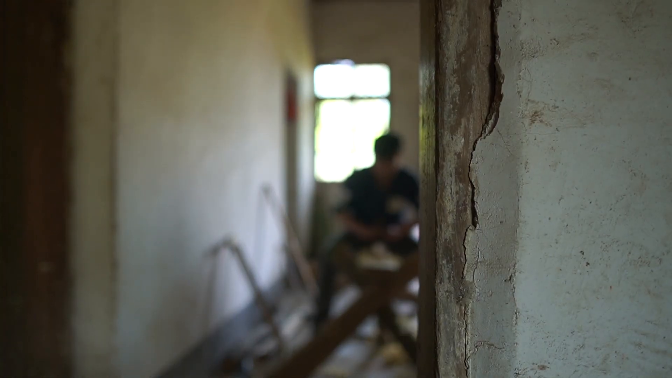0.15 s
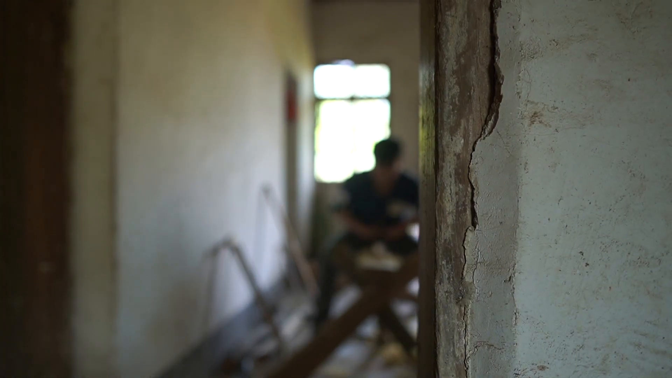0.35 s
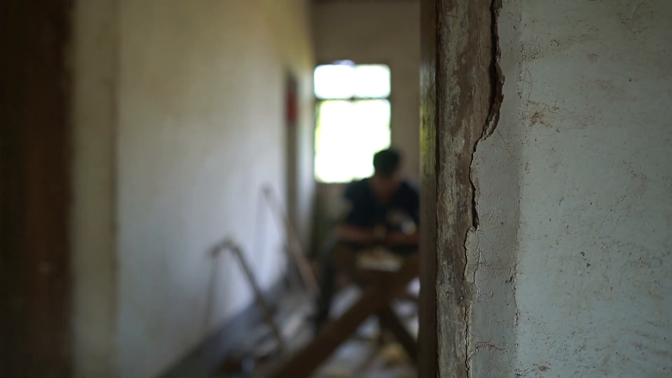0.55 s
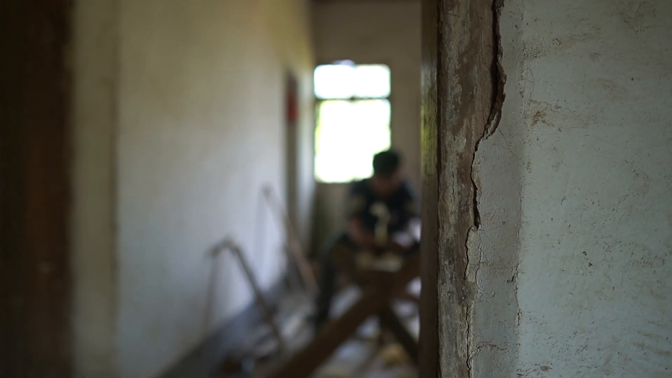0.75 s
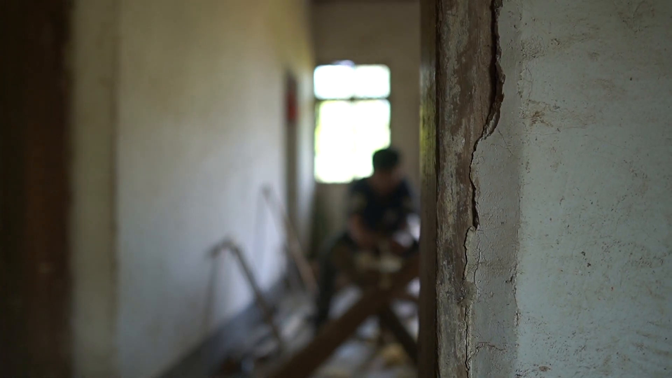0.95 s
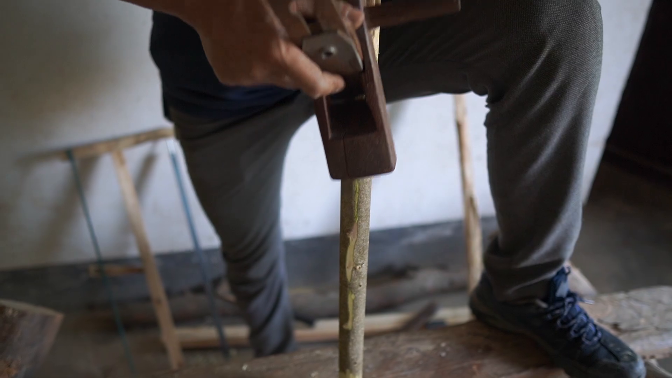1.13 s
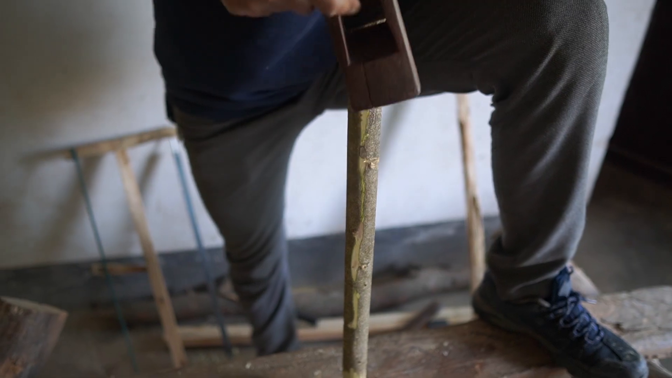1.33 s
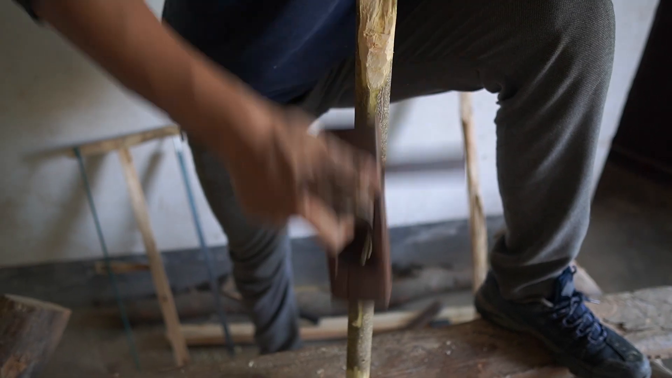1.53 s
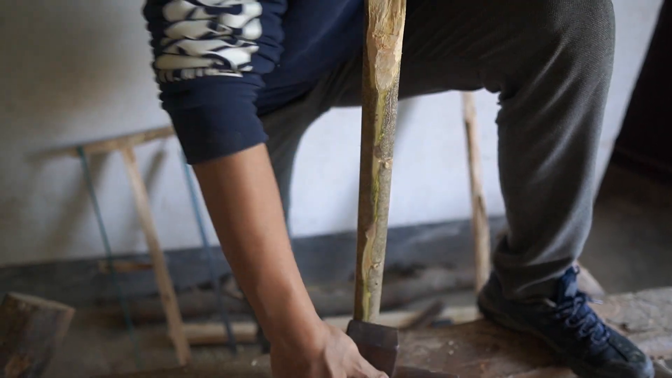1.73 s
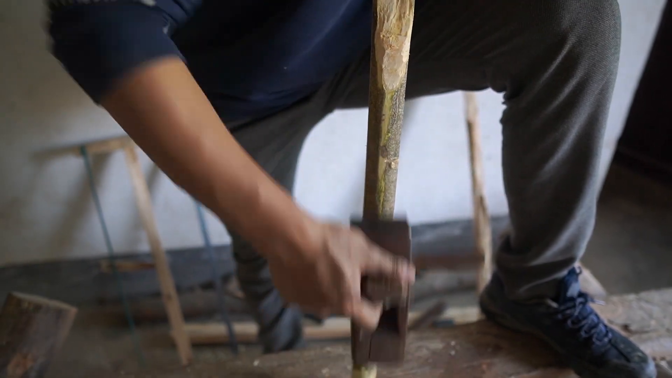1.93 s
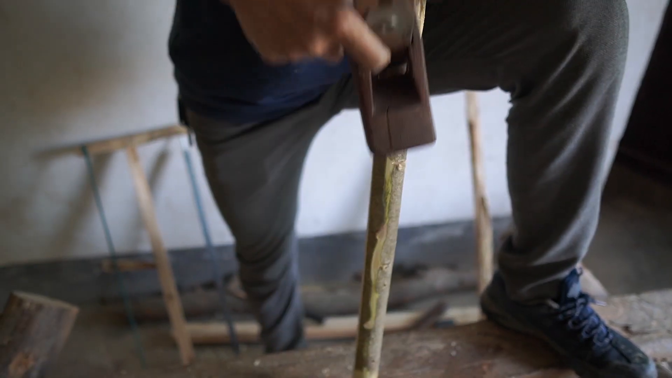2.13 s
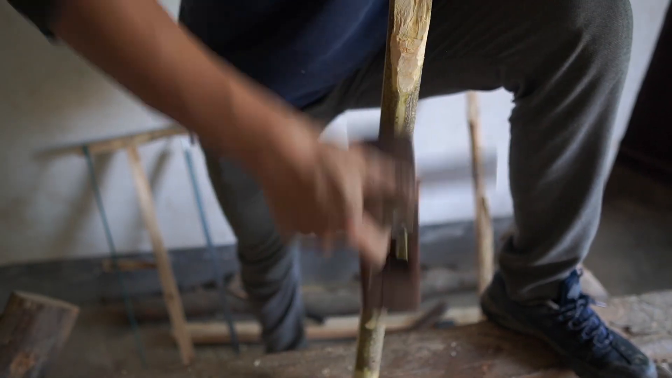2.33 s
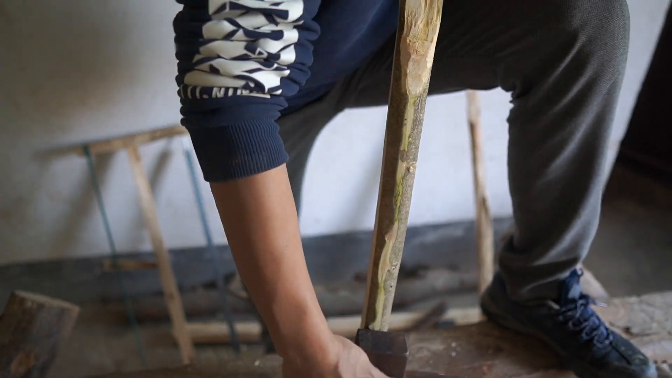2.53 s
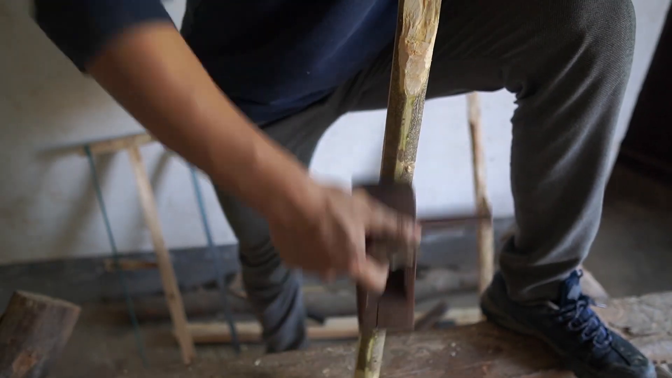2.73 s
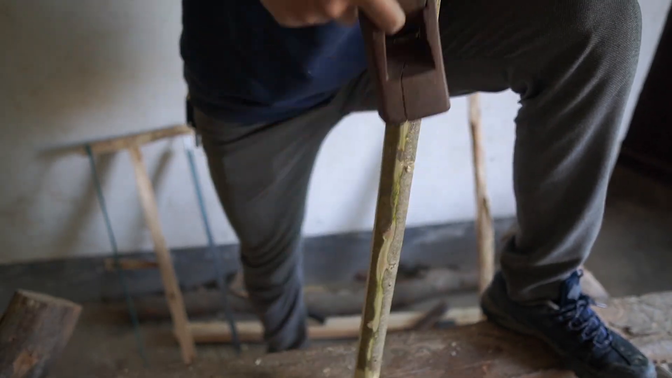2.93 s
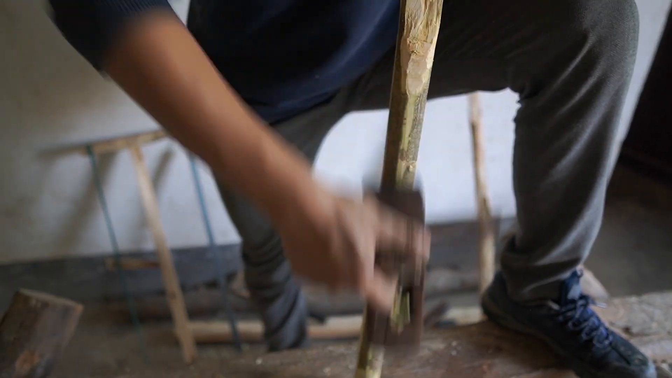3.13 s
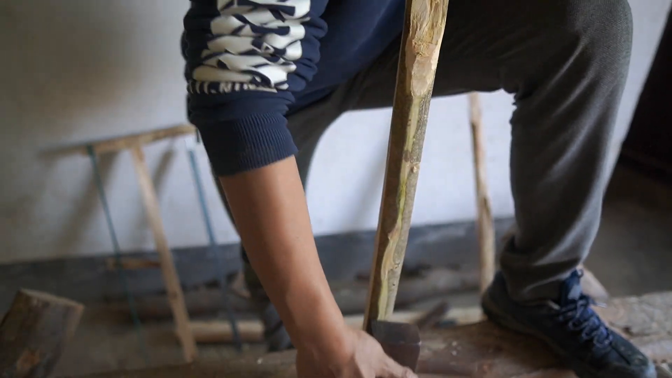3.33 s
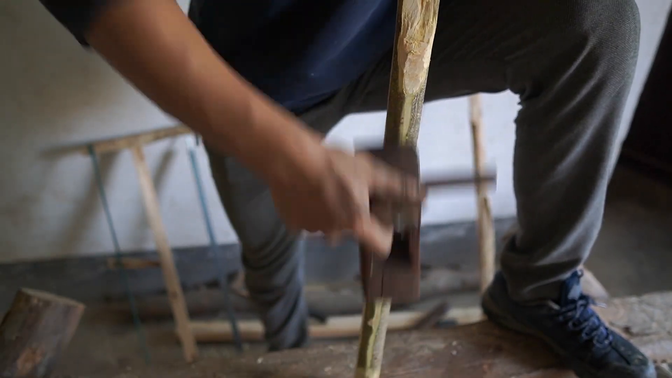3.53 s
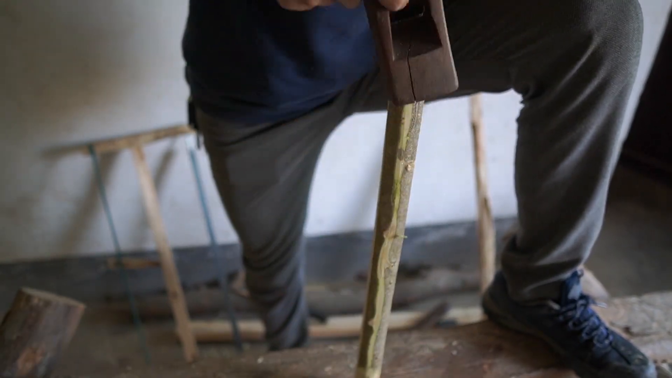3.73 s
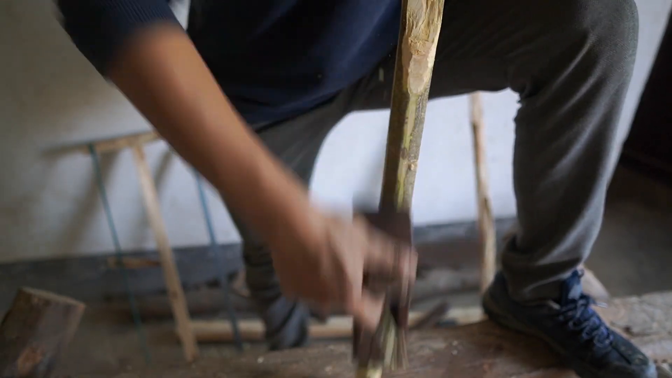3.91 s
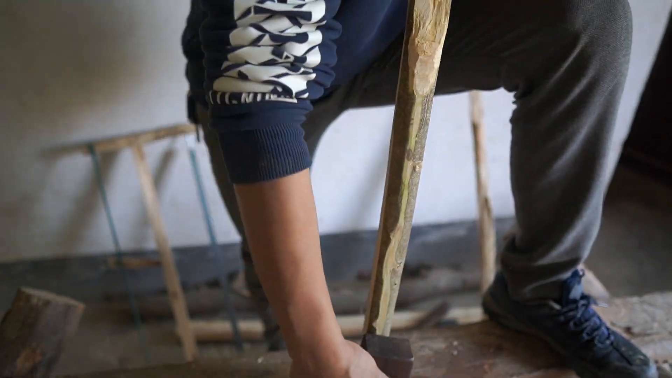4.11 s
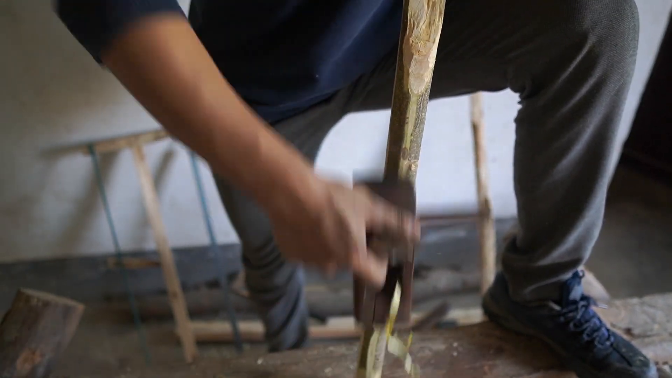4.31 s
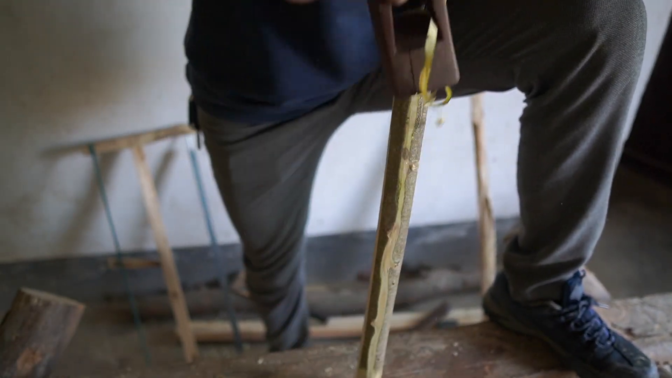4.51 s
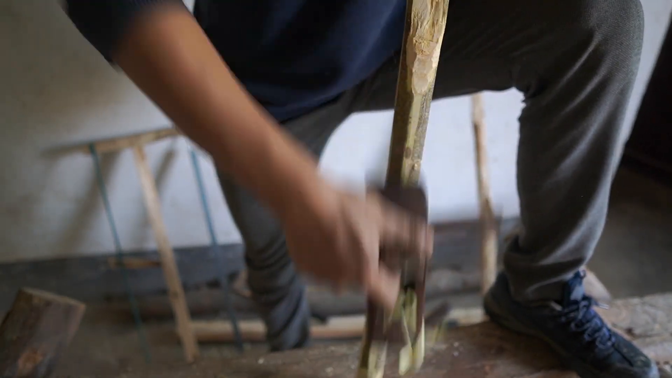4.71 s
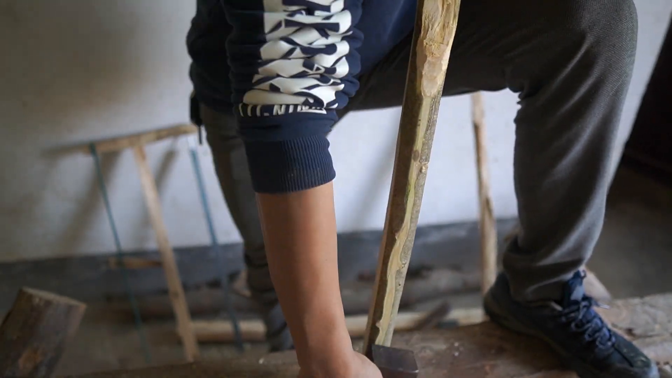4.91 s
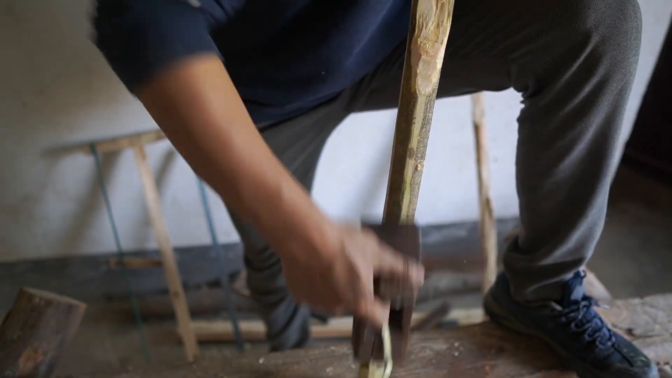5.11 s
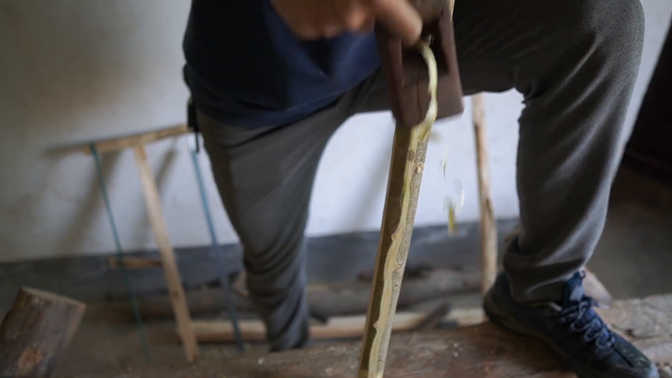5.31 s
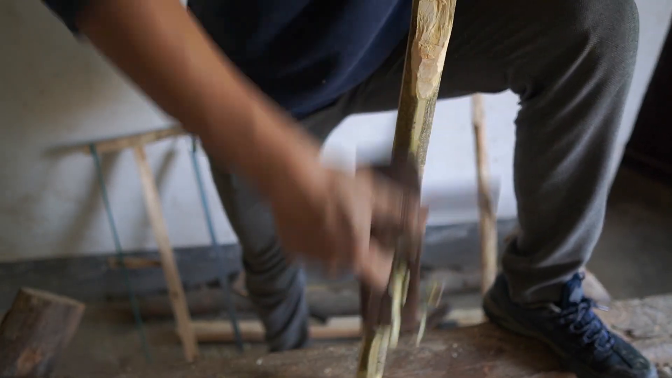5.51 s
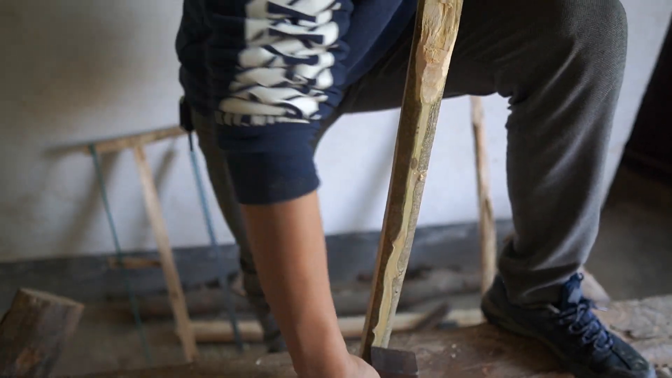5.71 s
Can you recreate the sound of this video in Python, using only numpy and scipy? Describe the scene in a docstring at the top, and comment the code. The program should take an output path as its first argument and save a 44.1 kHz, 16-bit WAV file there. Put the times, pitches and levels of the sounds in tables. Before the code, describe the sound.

A hand plane scrapes a green wooden stick, one echoing stroke from a doorway, then six crisp close strokes with knocks and rattles between.

```python
"""A bare plastered room: a wooden hand plane shaves a green stick into a handle on a workbench.
One stroke is heard from the doorway, then, after a cut, six from close by. Random fibre snaps, gated by
each stroke, ring the wooden stock, the shaving and the iron. Between strokes the sole is dragged back and the
plane is set down with knocks that ring the bench; the stick shudders, rattles and bumps, and sleeves rustle.
Table levels are relative, before the mix gains in each function."""
import sys
import numpy as np
from scipy import signal
from scipy.fft import rfft, irfft
from scipy.io import wavfile
from scipy.ndimage import map_coordinates

SR = 44100
rng = np.random.default_rng(int(sys.argv[2]) if len(sys.argv) > 2 else 0)


def wrap_up_sound(samples):
    """Save the sound to the file named by the first command line argument, as 16-bit audio."""
    columns = np.atleast_2d(samples).T
    # keep every value between -1 and 1, then stretch to whole-number steps
    tamed = np.clip(columns, -1, 1)
    steps = np.round(tamed * 32767).astype(np.int16)
    wavfile.write(sys.argv[1], SR, steps)


N = 254016
TIME = np.arange(N) / SR

# close strokes: start [t/s], length [t/s], deepening [1 = usual], stock, tearing, iron, bench [level/dB],
# run-up [t/s], run-up [level/dB], sleeve rustle on the way back [level/dB]
STROKES = [(1.55, 0.18, 1, -21.5, -22.5, -24, -41, 0.023, -29, -48),
           (2.351, 0.17, 0.42, -21, -21.5, -21.5, -41, 0.07, -39, -53),
           (3.129, 0.2, 0.71, -22, -21, -21, -42.5, 0.064, -31.5, -47),
           (3.932, 0.16, 1.62, -20.5, -23, -24, -38, 0.083, -27, -44.5),
           (4.711, 0.19, 0.92, -19.5, -23, -22.5, -38, 0.075, -33.5, -45),
           (5.554, 0.17, 1.22, -21, -23, -24, -36.5, 0.043, -27, -48)]
# iron jumps out of the cut and bites again: start, end [t/s], loss (negative = gain), new-bite jolt [level/dB]
SKIPS = [(1.604, 1.627, 30, 8), (2.389, 2.421, 33, 6.5), (3.171, 3.184, 14, 2), (3.98, 4.03, -1, 9.5),
         (4.787, 4.804, 9, 2.5)]
# change over a full stroke of usual deepening
STOCK_RISE_DB, TEAR_RISE_DB, IRON_FALL_DB = 9.5, 2, 12
ENTRY_DB, ENTRY_S = 7.5, 0.013   # extra jolt as the edge enters the wood
DEEPEST_SHARE, EASE_DB = 0.94, 5   # share of stroke at deepest cut; loss as the push eases after it
GRAIN_HZ, GRAIN_DB = 22.7, 1.8   # uneven grain makes each part waver


def bite():
    """Gains of stock, tearing and iron: each stroke starts bright, grows woodier as it deepens, then eases."""
    total = 0
    for start, length, deepening, stock_db, tear_db, iron_db, *_ in STROKES:
        travel = np.clip((TIME - start) / length, 0, 1)
        depth = deepening * (np.minimum(travel / DEEPEST_SHARE, 1) - .5)
        ease_db = EASE_DB * np.maximum(travel - DEEPEST_SHARE, 0) / (1 - DEEPEST_SHARE)
        entry_db = ENTRY_DB * np.exp(-np.maximum(TIME - start, 0) / ENTRY_S)
        parts_db = [stock_db + STOCK_RISE_DB * depth + entry_db,
                    tear_db + TEAR_RISE_DB * depth + entry_db,
                    iron_db - IRON_FALL_DB * depth]
        total = total + contact(start, start + length, release_s=0.017) * from_db(parts_db - ease_db)
    skips_db = 0
    for start, end, loss_db, jolt_db in SKIPS:
        lift = np.clip((TIME - start) / 0.011, 0, 1) * (TIME < end)
        skips_db = skips_db + jolt_db * contact(end, end, ENTRY_S) - loss_db * lift
    return [part * from_db(skips_db) * flutter(GRAIN_HZ, GRAIN_DB) for part in total]


# resonances of the stock: centre [f/Hz], width [f/Hz], [level/dB]
STOCK_MODES = [(1706, 160, 1.5), (1781, 202, 2), (1918, 181, -0.5), (2340, 164, -1.5), (2405, 237, -4),
               (2751, 73, 0), (3113, 270, -8), (3340, 210, -11.5), (3804, 98, -6.5)]
# resonances of the shaving: centre [f/Hz], width [f/Hz], [level/dB]
SHAVING_MODES = [(4384, 31, 1.5), (5140, 108, 0.5), (5560, 91, -3.5), (6058, 180, 0), (6720, 194, 0),
                 (7097, 124, 2), (7204, 115, 0), (7830, 390, -12.5)]
# resonances of the iron: centre [f/Hz], width [f/Hz], [level/dB]
IRON_MODES = [(9024, 74, 2.5), (8500, 130, -8.5), (9534, 200, -9.5), (10270, 730, -15), (12070, 230, -6.5),
              (12470, 81, -7.5), (14400, 1700, -21), (14800, 400, -10.5)]
# stick-slip locked onto one resonance: start, end [t/s], [f/Hz], [level/dB]
CHIRPS = [(1.551, 1.584, 6020, -11), (1.663, 1.675, 12500, -13), (2.486, 2.513, 2748, -10),
          (2.557, 2.571, 2750, -19), (3.218, 3.24, 5240, -13.5), (3.3, 3.307, 2760, -7.5),
          (3.952, 3.97, 11660, -12.5), (4.852, 4.908, 2784, -15)]
SNAPS_PER_S, SNAPS_DB = 140, -9.5   # thick fibres give way one by one


def cutting():
    """The iron grips and slips through the grain; snapping fibres ring stock, shaving and iron."""
    stock, tearing, iron = bite()
    grip = flutter(rate_hz=130, depth_db=1.2)
    stock_force = fibres(2500, spread_db=0) * stock * grip * flutter(rate_hz=147, depth_db=4)
    wood = resonate(stock_force, STOCK_MODES, low_hz=1410)
    shaving = resonate(fibres(12000, spread_db=0.5) * tearing * grip, SHAVING_MODES, low_hz=3550)
    edge = resonate(fibres(12000, spread_db=4) * iron * grip, IRON_MODES, low_hz=6740)
    snaps = resonate(fibres(SNAPS_PER_S, spread_db=3.5) * tearing, STOCK_MODES + SHAVING_MODES, low_hz=1400)
    body = wander(from_db(-2) * wood + from_db(-4) * shaving + from_db(-1.5) * edge + from_db(SNAPS_DB) * snaps)
    # clumps of snaps, heard straight from the split
    splinters = fibres(6000, spread_db=2) * flutter(rate_hz=350, depth_db=6)
    crackle = rms_one(butter(splinters, [2000, 12000], "band")) * tearing
    chirps = 0
    for start, end, hz, db in CHIRPS:
        chirps = chirps + from_db(db) * contact(start, end, release_s=0.00048) * sing(hz, waver_hz=hz / 70)
    chirps = chirps * flutter(rate_hz=140, depth_db=2.5)
    return body + from_db(-6.5) * crackle + from_db(-10) * chirps


WANDER_HZ, WANDER_S = 11.83, .00012   # rate limit and rms delay


def wander(x):
    """Resonances shift together as the plane travels: a slowly varying delay bends all pitches."""
    delay = WANDER_S * SR * rms_one(butter(rng.standard_normal(N), WANDER_HZ, "low", order=4))
    return map_coordinates(x, [np.arange(N) - delay], order=3)


# doorway stroke: [t/s], stock, tearing, bench [level/dB]
FAR_CUT = [(0.471, -30, -40, -52), (0.488, -23.5, -35.5, -45), (0.605, -26.5, -34, -40.5),
           (0.723, -19.5, -21, -38), (0.738, -9.5, -15, -54), (0.765, -11, -32.5, -40),
           (0.792, -12.5, -25, -25.5), (0.865, -20.5, -38.5, -25.5), (0.91, -33, -51, -37.5),
           (0.985, -39, -71, -47)]
# light rubs before that stroke, swelling and fading: start, end [t/s], [level/dB]
FAR_RUBS = [(-0.07, 0.16, -35), (0.179, 0.32, -35)]
# stock resonances from the doorway: centre [f/Hz], width [f/Hz], [level/dB]
FAR_STOCK_MODES = [(888, 37, -6), (1188, 47, -8), (1594, 103, 2.5), (1746, 66, 1), (1852, 66, 1.5),
                   (2267, 280, -3), (2756, 55, 1), (3260, 260, -8), (3570, 100, -8), (3730, 33, -7)]
# sole resonances from the doorway: centre [f/Hz], width [f/Hz], [level/dB]
FAR_SOLE_MODES = [(1717, 100, 4), (1850, 89, 3), (2770, 40, 0.5), (3850, 44, -6), (5400, 120, -13),
                  (7450, 150, -17)]
# tearing hiss from the doorway, spectrum: [f/Hz], [level/dB per Hz]
FAR_HISS = [(2500, -31), (4000, 2), (4600, -4), (5300, 0), (5750, -12), (6050, 2.5), (6500, -5), (6950, 1),
            (8000, -9.5), (9000, -5), (12000, -11.5), (16000, -15)]
# bench thrum from the doorway, spectrum: [f/Hz], [level/dB per Hz]
FAR_BENCH = [(50, -62), (120, -44), (250, -6.5), (450, -7.5), (580, 3.5), (780, 3.5), (980, -21),
             (1150, 10), (1400, -18), (2400, -50)]
DIG_S = .752   # the iron digs in


def far_stroke():
    """From the doorway: light rubs with a thin squeak, then a long cut that digs in, darkens and groans."""
    s, *columns_db = np.transpose(FAR_CUT)
    levels = from_db([np.interp(TIME, s, db) for db in columns_db])
    stock, tearing, bench = contact(s[0], s[-1], release_s=0.017) * levels
    rub = 0
    for start, end, db in FAR_RUBS:
        rub = rub + from_db(db) * np.sin(np.pi * np.clip((TIME - start) / (end - start), 0, 1))
    # digging in: coarser, duller pulses
    digging = contact(DIG_S, 1, release_s=0.022)
    chatter = (1 - digging) * flutter(rate_hz=230, depth_db=2) + digging * flutter(rate_hz=160, depth_db=3.5)
    force = fibres(5000, spread_db=0) * (stock * chatter + rub)
    light_force = (1 - digging) * force
    dull_force = digging * butter(force, 2140, "low", order=3)
    sole = resonate(light_force, FAR_SOLE_MODES, low_hz=1320)
    wood = resonate(from_db(-2.5) * light_force + from_db(3.5) * dull_force, FAR_STOCK_MODES, low_hz=880)
    hiss = colour(fibres(8200, spread_db=2), FAR_HISS) * (tearing + from_db(-10) * rub)
    thrum = colour(fibres(2500, spread_db=-0.5), FAR_BENCH) * bench * chatter
    whistle = sing(1085, waver_hz=15) * flutter(rate_hz=45, depth_db=3)
    squeak_gain = from_db(-50) * contact(-1, .18, release_s=.008) + from_db(-58.5) * contact(.19, .33, release_s=.12)
    moan = sing(587, waver_hz=15) * flutter(rate_hz=60, depth_db=2)
    groan = moan * contact(.842, 0.985, release_s=0.012)
    scrape = from_db(-3.5) * wood + from_db(-7.5) * sole + from_db(-3) * hiss + from_db(-3) * thrum
    return scrape + whistle * squeak_gain + from_db(-39) * groan


# sole dragged back along the stick: start, end [t/s], stock, hiss [level/dB]
DRAGS = [(1.158, 1.246, -42.5, -51), (1.953, 1.971, -27.5, -46), (1.992, 2.008, -28, -44.5),
         (2.714, 2.814, -29.5, -41.5), (2.725, 2.735, -23.5, -60), (2.776, 2.793, -24.5, -36),
         (3.487, 3.518, -25, -36.5), (3.541, 3.575, -19, -33.5), (4.286, 4.304, -20, -37.5),
         (5.095, 5.123, -26, -44), (5.189, 5.213, -24.5, -31.5)]


def slide():
    """Gains of stock and hiss as the sole slides uncut: drags back, and a swelling run-up to each stroke."""
    drags, run_ups = 0, 0
    for start, end, stock_db, hiss_db in DRAGS:
        drags = drags + contact(start, end, release_s=0.004) * from_db([[stock_db], [hiss_db]])
    for start, *_, lead_s, db, _ in STROKES:
        growth = np.sqrt(np.clip((TIME - start) / lead_s + 1, 0, 1))
        run_ups = run_ups + contact(start - lead_s, start, release_s=0.0025) * growth * from_db(db)
    return drags + run_ups * from_db([[0], [-7]])


# resonances of the sole on the stick: centre [f/Hz], width [f/Hz], [level/dB]
SOLE_MODES = [(1670, 64, -22), (1840, 170, 17), (2300, 240, 11), (2540, 120, 9.5), (2768, 160, 15),
              (3244, 160, 8.5), (3910, 89, 10)]


def dragging():
    """Without cutting, the sole skips over the bark and rings mostly in its low modes."""
    push, graze = slide() * fibres(2500, spread_db=2) * flutter(rate_hz=38, depth_db=0.5)
    wood = resonate(push, SOLE_MODES, low_hz=1270)
    hiss = resonate(graze, SHAVING_MODES + IRON_MODES, low_hz=3450)
    return from_db(-5) * wood + from_db(-2.5) * hiss


# plane set down on the stick: [t/s], stock, iron, bench [level/dB]
KNOCKS = [(2.058, -20.5, -31.5, -40), (2.824, -24, -24.5, -42), (3.091, -44, -29, -67.5),
          (3.599, -17, -22, -37.5), (3.879, -32.5, -19.5, -44), (4.383, -28.5, -26.5, -40.5),
          (4.403, -20.5, -17.5, -42.5), (4.685, -30.5, -29, -37.5), (5.192, -30.5, -40, -44.5),
          (5.503, -33.5, -25.5, -44)]
# long low ring of the workbench: [f/Hz], [level/dB], t60 [t/s]
BENCH_RING = [(82, -34, 4.6), (86.2, -25, 5.8), (174.4, -19, 4.1), (273, -16, 5.1)]
# bench spectrum: [f/Hz], [level/dB per Hz]
BENCH = [(40, -38), (80, -14), (130, -8), (180, -9), (230, -8), (275, -1), (350, -13), (450, -1), (590, -7),
         (720, -1), (930, -4), (1100, 5), (1400, -16.5), (2600, -18.5)]


def knocking():
    """Each knock is a brief crunch into stock and iron, and a thud that leaves the bench ringing."""
    s, stock_db, iron_db, bench_db = np.transpose(KNOCKS)
    crunch = rng.standard_normal(N)
    wood = resonate(crunch * blows(s, stock_db, decay_s=0.0027), SOLE_MODES, low_hz=970)
    crack = rms_one(butter(crunch, [1300, 3000], "band")) * blows(s, stock_db, decay_s=.004)
    tick = resonate(crunch * blows(s, iron_db, decay_s=0.0005), SHAVING_MODES + IRON_MODES, low_hz=3000)
    thud = colour(rng.standard_normal(N), BENCH) * blows(s, bench_db, decay_s=0.048)
    thud = butter(thud, 540, "high")
    shove = np.zeros(N)
    shove[(s * SR).astype(int)] = from_db(bench_db)
    hum = sum(from_db(db) * ring(shove, hz, t60) for hz, db, t60 in BENCH_RING)
    return from_db(7) * wood + from_db(-1) * crack + from_db(9) * tick + from_db(-4.5) * thud + hum


# stick shifts against the bench: [t/s], peak [level/dB], centre of the excited range [f/Hz]
BUMPS = [(1.545, -25, 790), (2.061, -25, 585), (2.066, -29, 1040), (2.104, -28.5, 627), (2.954, -37.5, 474),
         (3.142, -32, 845), (3.604, -39, 655), (3.797, -32, 666), (4.404, -32.5, 614), (4.653, -32, 194.7),
         (4.687, -37, 200), (4.939, -31, 200), (4.947, -29, 433), (4.944, -26.5, 845), (4.971, -30.5, 177),
         (5.004, -33, 440), (5.262, -29, 596)]
# modes of the stick propped on the bench: [f/Hz], [level/dB], t60 [t/s]
STICK_MODES = [(187, -3, 0.15), (216, -5.5, 0.13), (270, -3.5, .18), (429, 1.5, 0.089), (375, -5.5, 0.087),
               (505, -10, 0.36), (592, 2, 0.064), (686, -7.5, 0.14), (815, 1, 0.036), (1033, 1, .11)]
BUMP_OCTAVES = 0.36   # width of the range that a bump excites
SHAKE_REST_DB, SHAKE_SWING_DB = -54.5, -51.5   # at rest; added as the arms swing back
SHAKE_DRAG_DB, SHAKE_RELEASE_S = -33.5, 0.03   # relative to a drag; decay after a stroke
RATTLES_PER_S, RATTLE_DB, RATTLE_S = 70, -3, 0.064   # loose stick: rate, mix gain, decay after a knock


def workbench():
    """The stick shudders and rattles under strokes, drags and knocks, and shifts with dull modal bumps."""
    load = 0
    for start, length, *_, db, _, _, _ in STROKES:
        growth = np.clip((TIME - start) / length + 0.48, 0, 1)
        load = load + from_db(db) * contact(start, start + length, SHAKE_RELEASE_S) * growth
    swing = from_db(SHAKE_SWING_DB) * arms_back().sum(axis=0)
    shake = from_db(SHAKE_REST_DB) + load + from_db(SHAKE_DRAG_DB) * slide()[0] + swing
    shudder = colour(fibres(1200, spread_db=2.5), BENCH) * shake
    knock_s, *_, knock_db = np.transpose(KNOCKS)
    unrest = from_db(-5) * shake + blows(knock_s, knock_db, RATTLE_S)
    s, bump_db, centre_hz = np.transpose(BUMPS)
    bumps, rattle = 0, 0
    for hz, db, t60 in STICK_MODES:
        taps = np.zeros(N)
        nearness = np.exp(-(np.log2(hz / centre_hz) / BUMP_OCTAVES) ** 2)
        taps[(s * SR).astype(int)] = from_db(bump_db + db) * nearness
        # a soft contact has no sharp edge
        bumps = bumps + butter(ring(taps, hz, t60), [hz / 1.6, hz * 1.7], "band")
        mode = ring(fibres(RATTLES_PER_S, spread_db=3), hz, t60 / 2)
        rattle = rattle + from_db(db) * np.sqrt(hz) * rms_one(butter(mode, hz / 2, "high"))
    return from_db(-2.5) * shudder + from_db(-1.5) * bumps + from_db(RATTLE_DB) * rms_one(rattle) * unrest


ARM_BACK_S, ARM_SWING_S = 0.55, 0.15   # delay after a stroke starts, half-length


def arms_back():
    """Speed of the arms as they swing back, 0-1: one row for each stroke."""
    return np.array([swell(start + ARM_BACK_S, ARM_SWING_S) for start, *_ in STROKES])


# rustle spectrum: [f/Hz], [level/dB per Hz]
CLOTH = [(700, -29), (1500, 13), (2500, 6.5), (4200, 6.5), (7000, -3), (12000, -7), (16000, -12)]
CUT_S = 1.103   # cut from the listening position in the doorway to the one at the bench
CLOTH_DOOR_DB, CLOTH_REST_DB = -48.5, -52.5   # steady rustle from the doorway, from close by
CURL_DB, CURL_RELEASE_S = -14.5, 0.046   # curling shaving: relative to the tearing, decay


def background():
    """Sleeves rustle as the arms swing back, and each shaving rustles as it curls away: coloured crinkles."""
    swings = from_db([stroke[-1] for stroke in STROKES]) @ arms_back()
    motion = np.where(TIME < CUT_S, from_db(CLOTH_DOOR_DB), from_db(CLOTH_REST_DB)) + swings
    curl = 0
    for start, length, _, _, tear_db, *_ in STROKES:
        curl = curl + from_db(tear_db + CURL_DB) * contact(start, start + length, CURL_RELEASE_S)
    crinkles = colour(fibres(5000, spread_db=3.5), CLOTH)
    return crinkles * (motion + curl) * flutter(rate_hz=28, depth_db=2.5)


# room air spectrum: [f/Hz], [level/dB per Hz]
AIR = [(30, -34), (120, -20), (190, -16.5), (270, 0), (350, -9.5), (520, 1), (1000, -4), (2000, -30),
       (6000, -17), (16000, -25)]


def room_air():
    """Steady coloured noise of the room."""
    return from_db(-54.5) * colour(rng.standard_normal(N), AIR)


# how differently reflections reach the two ears: [f/Hz], side minus mid [level/dB]
WIDTH = [(100, -83), (300, -18), (700, -2), (2000, -3.5), (5000, -0.5), (13000, 4.5)]


def room(x, t60, early_db, tail_db, early_s):
    """Direct sound plus early reflections and a tail with decay set per band, different at each ear."""
    t, edges = TIME[:int(.8 * SR)], np.geomspace(60, 18000, 13)
    tail = 0
    for low, high in zip(edges, edges[1:]):
        hz = np.sqrt(low * high)
        mid, side = butter(rng.standard_normal((2, len(t))), [low, high], "band")
        decay = from_db(tail_db - 60 * t / at_hz(t60, hz)) + from_db(early_db) * np.exp(-t / early_s)
        tail = tail + (mid + from_db(at_hz(WIDTH, hz)) * side * [[1], [-1]]) * decay
    tail = tail * np.clip(t / .003 - .5, 0, 1) / np.sqrt(.05 * SR)
    return x + signal.oaconvolve(x[None], tail, axes=1)[:, :N]


def fibres(per_s, spread_db):
    """Fibres snap at random, with force spread by spread_db; rms 1."""
    sizes = from_db(spread_db * np.minimum(rng.exponential(1, N), 4)) * rng.choice([-1, 1], N)
    return rms_one(sizes * (rng.random(N) < per_s / SR))


def resonate(force, modes, low_hz):
    """Parallel resonances of a small body that radiates little below low_hz; white force keeps its level."""
    t, response = TIME[:4096], 0
    for k, (hz, width_hz, db) in enumerate(modes):
        decay = width_hz * np.exp(-np.pi * width_hz * t)
        response = response + (-1) ** k * from_db(db) * decay * np.cos(2 * np.pi * hz * t)
    response = butter(response, low_hz, "high", order=4)
    return signal.oaconvolve(force, response / np.linalg.norm(response))[:N]


def ring(force, hz, t60):
    """A unit click sets a decaying sine of height 1 ringing."""
    r, w = from_db(-60 / (t60 * SR)), 2 * np.pi * hz / SR
    return signal.lfilter([0, np.sin(w)], [1, -2 * r * np.cos(w), r * r], force + 1e-18)


def sing(hz, waver_hz):
    """A friction-driven resonance: steady in strength, unsteady in pitch; rms 1."""
    pitch_hz = hz + waver_hz * rms_one(butter(rng.standard_normal(N), 2 * waver_hz, "low"))
    return np.sqrt(2) * np.sin(2 * np.pi * np.cumsum(pitch_hz) / SR)


def contact(start, end, release_s):
    """A contact grips within two milliseconds and lets go gradually."""
    grip = np.clip((TIME - start) / .002 + .5, 0, 1)
    return grip * np.exp(-np.clip((TIME - end) / release_s, 0, 30))


def blows(times, levels_db, decay_s):
    """Envelope of blows that start at once and die away."""
    total = 0
    for s, db in zip(times, levels_db):
        total = total + from_db(db) * (TIME >= s) * np.exp(-np.clip((TIME - s) / decay_s, 0, 30))
    return total


def swell(centre, half_s):
    """A smooth rise and fall of height 1."""
    return np.exp(-np.minimum(((TIME - centre) / half_s) ** 2, 30))


def flutter(rate_hz, depth_db):
    """A randomly wavering gain of rms 1."""
    waver = rms_one(butter(rng.standard_normal(N), rate_hz, "low"))
    return rms_one(from_db(depth_db * np.clip(waver, -2, 2)))


def colour(x, spectrum):
    """Give a steady white source a spectrum; rms 1."""
    gain = from_db(at_hz(spectrum, np.arange(N // 2 + 1) * SR / N))
    return rms_one(irfft(rfft(x) * gain, N))


def butter(x, hz, kind, order=2):
    """Butterworth filter."""
    sos = signal.butter(order, np.clip(hz, 10, .45 * SR), kind, fs=SR, output="sos")
    return signal.sosfilt(sos, x + 1e-18)


def at_hz(points, hz):
    """Read a table along a log-frequency axis."""
    f, value = np.transpose(points)
    return np.interp(np.log(np.maximum(hz, 1)), np.log(f), value)


def from_db(db):
    """Decibels to gain."""
    return 10 ** (np.asarray(db) / 20)


def rms_one(x):
    """Scale to unit rms."""
    return x / np.sqrt(np.mean(x ** 2) + 1e-20)


# reverberation at the bench: [f/Hz], t60 [t/s]
ROOM_T60 = [(150, 0.89), (600, 0.41), (2000, 0.4), (5000, 0.38), (9000, 0.24), (15000, 0.2)]
# reverberation from the doorway: [f/Hz], t60 [t/s]
FAR_T60 = [(150, 0.71), (600, 0.29), (2000, 0.47), (5000, 0.5), (9000, 0.14), (15000, 0.15)]


def scene():
    """The far stroke is mostly room sound; after a brief dip the close work is drier, a little to the right."""
    rustle = background()
    far = room(far_stroke() + from_db(-6) * rustle, FAR_T60, early_db=9, tail_db=-4, early_s=0.0041)
    work = cutting() + dragging() + knocking() + workbench()
    near = room(work + rustle, ROOM_T60, early_db=-10.5, tail_db=-3, early_s=0.0066)
    air = room_air()
    at_door = contact(-1, CUT_S, release_s=0.0015)
    at_bench = np.clip((TIME - CUT_S) / 0.039, 0, 1)
    # left and right gains
    far = far * from_db([[.6], [-.6]])
    near = near * from_db([[-.7], [.7]])
    return (far + air) * at_door + (near + air) * at_bench


CUTOFF_HZ = 15900


def record(dry):
    """Peaks are rounded, the deepest bass is rolled off and the top is cut steeply."""
    rounded = butter(0.78 * np.tanh(dry / 0.9), 75, "high")
    return signal.sosfilt(signal.ellip(12, .1, 80, CUTOFF_HZ, fs=SR, output="sos"), rounded)


dry = scene()
out = record(dry)
wrap_up_sound(out)
```